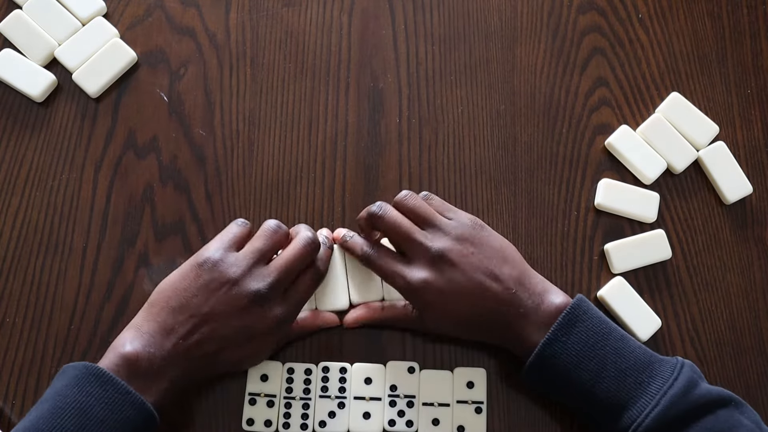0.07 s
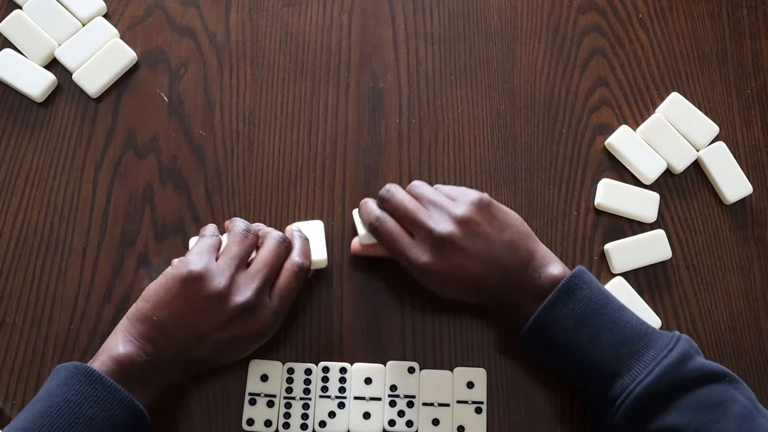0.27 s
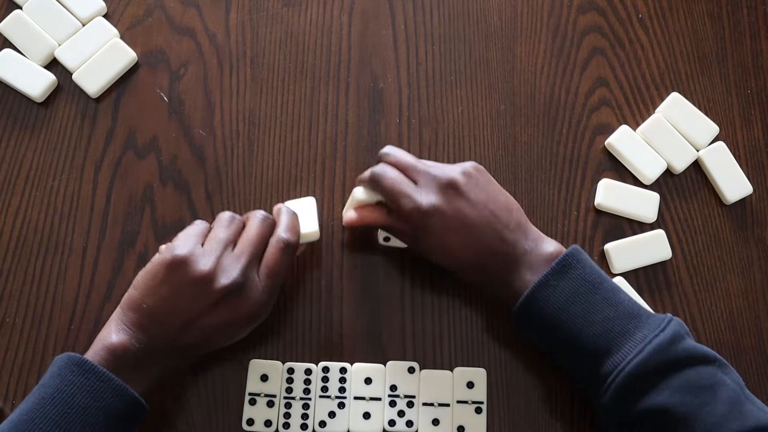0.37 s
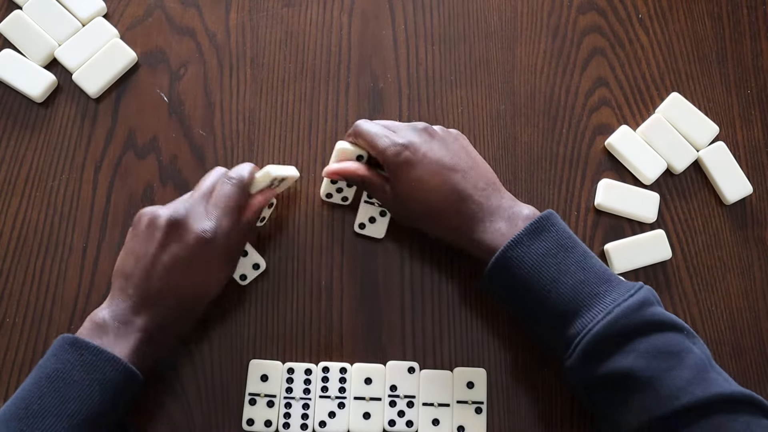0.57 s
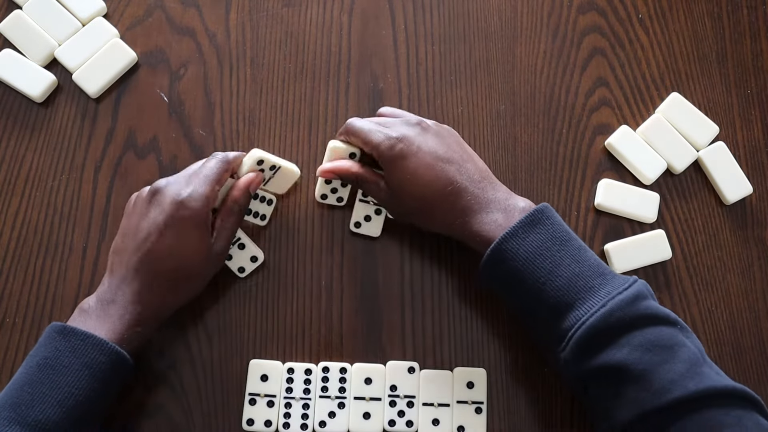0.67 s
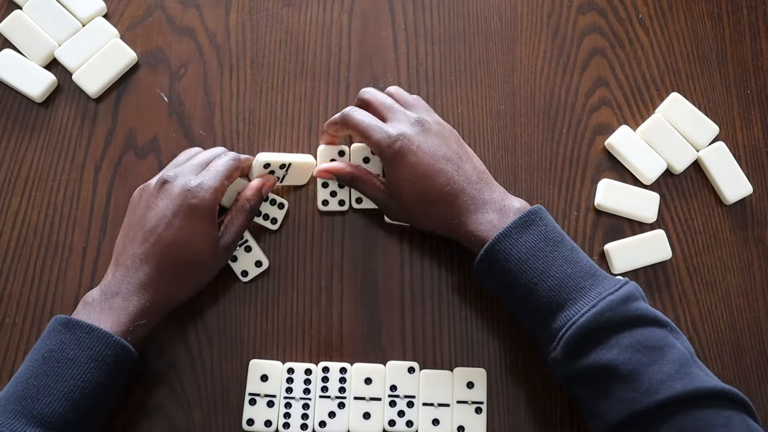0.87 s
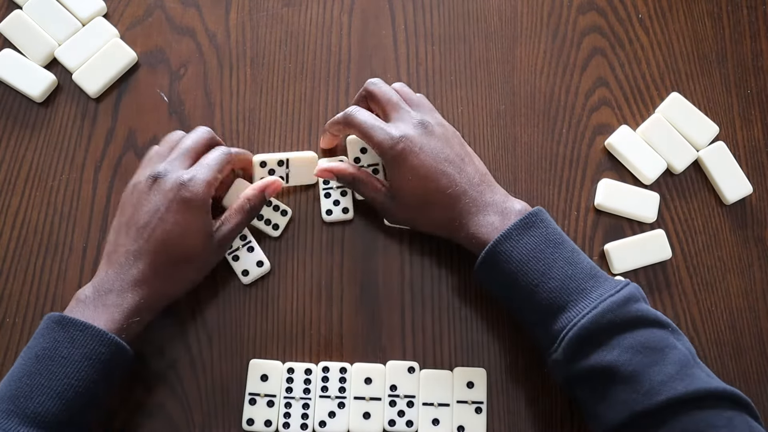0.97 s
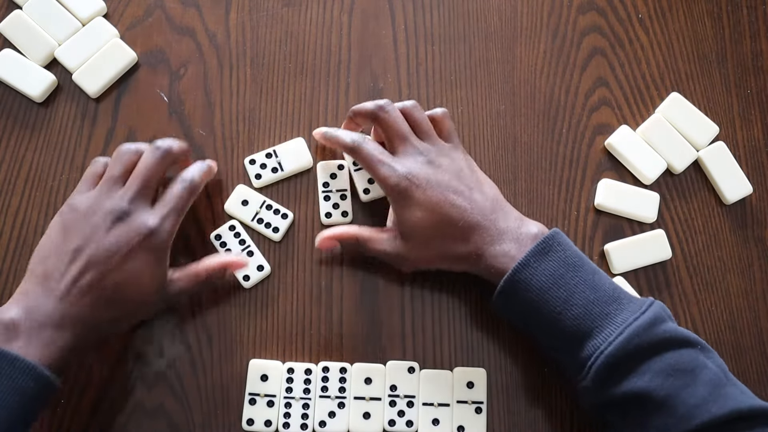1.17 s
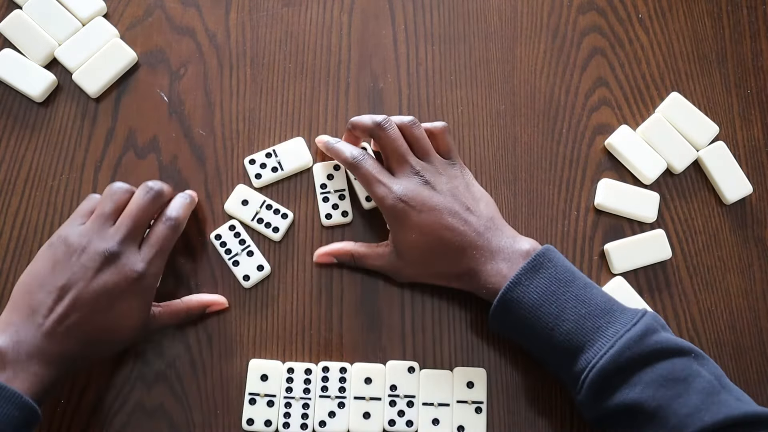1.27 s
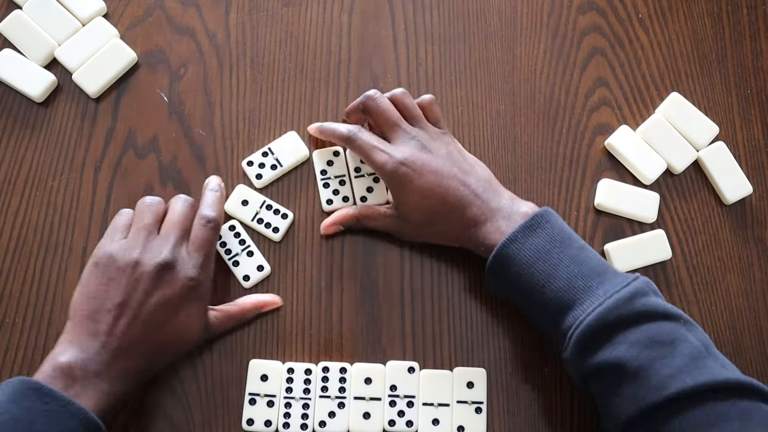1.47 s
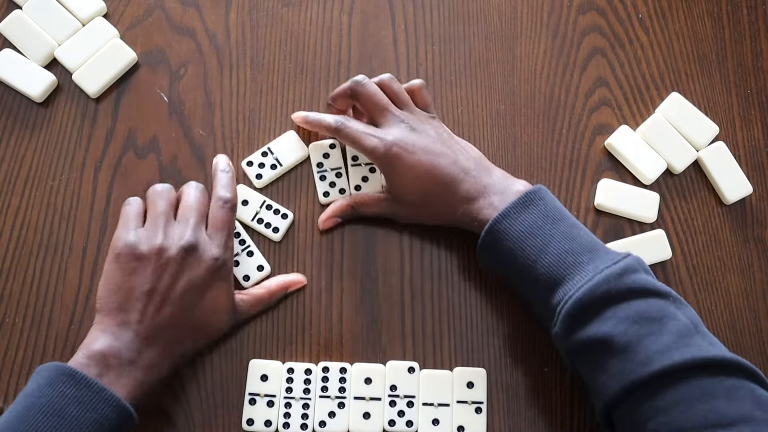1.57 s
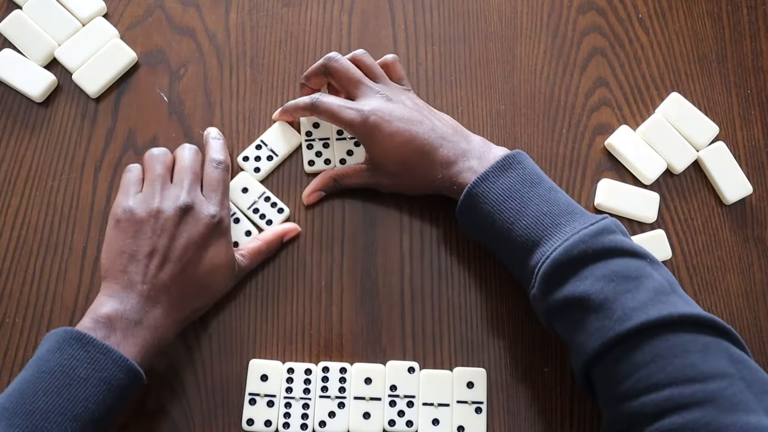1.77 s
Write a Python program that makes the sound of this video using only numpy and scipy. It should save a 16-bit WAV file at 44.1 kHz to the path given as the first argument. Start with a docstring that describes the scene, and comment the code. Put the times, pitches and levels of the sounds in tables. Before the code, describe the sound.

Hard domino tiles knocking, sliding and clicking against each other on a wooden tabletop.

```python
"""Dominoes on a wooden table

Two hands turn dominoes face up and push them about in a small room. The hard tiles slide
over the grain, knock on the wood, clack and jostle together, and twice drop flat with a thump.
Palms brush the table, the table top rings under the tiles, and the room adds a short echo."""
import sys
import numpy as np
from scipy import signal
from scipy.fft import rfft, irfft
from scipy.io import wavfile

SR = 44100
rng = np.random.default_rng(int(sys.argv[2]) if len(sys.argv) > 2 else 0)


def master_out(mix):
    """Clip the mix to full scale and print it as 16-bit PCM to the path in sys.argv[1]."""
    frames = np.transpose(np.atleast_2d(mix))
    ceiling = np.clip(frames, -1, 1)
    pcm = np.round(ceiling * 32767).astype(np.int16)
    wavfile.write(sys.argv[1], SR, pcm)


N = 79380   # 1.8 seconds

# Tiles pushed over wood. Each row: start and length in seconds, level in dB, cut-off in Hz, squeak in dB.
SLIDES = [(-.05, 0.18, -65, 2140, -1.5), (0.277, 0.049, -44.5, 2260, -6), (0.408, 0.27, -49, 1750, 0),
          (0.984, 0.36, -46.5, 4200, -13), (1.709, 0.13, -61, 4200, -12)]
# Hands brushing the table. Each row: start in seconds, length in seconds, level in dB.
BRUSHES = [(0, 0.51, -64), (0.31, 0.59, -64), (0.977, 0.37, -58), (1.324, 0.13, -62), (1.677, 0.13, -69.5)]
# A tile hits the table. Each row: start in seconds, level in dB, cut-off in Hz, bass boost in dB.
KNOCKS = [ (0.08, -51.5, 3120, 1), (0.2408, -30, 3240, -8.5), (0.2883, -32, 2700, -4.5),
          (.3130, -31, 1700, -8), (0.421, -40, 3160, -2), (0.5348, -34.5, 2420, 4), (0.5719, -27, 2820, -4),
          (0.5794, -26, 2480, 1), (0.6069, -25.5, 2770, 3.5), (0.6142, -27, 2660, 1.5),
          (0.7263, -31.5, 1510, 2), (.7944, -24.5, 3100, -1.5), (0.7972, -21.5, 2400, 2)]
# A tile hits a tile. Each row: start in seconds, level in dB, main ring in Hz, body and treble in dB.
CLACKS = [ (0.1992, -58, 2760, 13, 16), (0.2753, -41, 9470, -4, 2), (0.3124, -39.5, 8900, -8, -2),
          (0.4525, -38.5, 2880, 9.5, -4), (0.7263, -18, 2020, -5, 0), (0.7282, -25, 7800, -5, -12),
          (0.9626, -19, 3460, 0.5, -2.5), (1.0040, -18.5, 3720, 0.5, -3), (1.0065, -24.5, 3580, -9.5, 9),
          (1.0504, -23, 3020, 5, 7), (1.0539, -24, 5500, -3.5, 0), (1.0615, -27, 3430, -6.5, -2),
          (1.0660, -28.5, 3780, 2, 3), (1.0971, -32.5, 4370, 8, -5), (1.1059, -23, 3740, 5.5, 7),
          (1.111, -22, 4200, -2.5, 4), (1.1151, -23.5, 5100, -3, 4), (1.1171, -21, 2110, 2, 14),
          (1.1227, -30, 5330, -9, 4), (1.125, -23.5, 5640, -11.5, 14), (1.1632, -27, 2370, 1.5, 5),
          (1.167, -36, 5640, -7, 6), (1.2000, -24.5, 2860, -1, 5), (1.2046, -28.5, 6050, 1, 1),
          (1.2634, -21, 5020, -1, -4.5), (1.2648, -22.5, 8500, -6.5, -1), (1.5199, -44, 2140, -8.5, -17),
          (1.5287, -48.5, 4160, -6, -7), (1.6053, -44.5, 4200, -14, 17), (1.654, -51.5, 4200, 8, 2),
          (1.71, -37, 4160, -17, 14), (1.7339, -40.5, 4200, -17, 2), (1.759, -42, 4100, -13, -5),
          (1.782, -41.5, 4200, -11, 3), (1.7874, -35.5, 4300, -11.5, 10)]
# Tiles rubbing edge to edge. Each row: start in seconds, length in seconds, level in dB.
JOSTLES = [(0.713, 0.21, -53), (1.002, .28, -41), (1.718, 0.23, -57.5)]
# A tile drops flat. Each row: start in seconds, peak level in dB.
THUMPS = [(0.7965, -35), (1.1120, -37.5)]
# The tone of the background, tile on wood, hand on wood and tile on tile.
# Each row: frequency in Hz, gain in dB.
BACKGROUND_TONE = [(25, -8), (60, 4.5), (450, -6.5), (1200, -7.5), (1800, 1.5), (5000, -20), (15000, -40.5)]
WOOD_TONE = [(30, -19.5), (90, -14.5), (170, -8), (430, -1.5), (620, -2.5), (2000, 7.5), (10000, 2.5),
             (15000, -52.5)]
BRUSH_TONE = [(30, -47.5), (105, 9), (210, 6), (800, -4.5), (4000, -24), (15000, -40)]
CLACK_TONE = [(40, -42), (150, -12.5), (350, -8), (1800, 0.5), (4000, 2), (6500, -1.5), (9200, -6),
              (10800, -10.5), (16000, -15.5)]
# The notes a tile rings at. Each row: pitch in Hz, level in dB, fade time in seconds.
# A fade time is how long a sound takes to drop by 60 dB.
TILE_NOTES = [(1840, -13.5, 0.039), (4200, -18.5, 0.014), (8700, -19, 0.009)]
# The notes the table top rings at. Each row: pitch in Hz, gain in dB.
TABLE_NOTES = [(168, 7.5), (428, 12.5), (471, 10), (768, 9), (1229, 2.5)]
# How strong the room's echo is. Each row: frequency in Hz, level in dB.
ROOM_LEVEL = [(200, 0), (1000, 2.5), (4500, -5.5), (8000, -11), (14000, -4.5)]
# How long the echo lasts. Each row: frequency in Hz, fade time in seconds.
ROOM_FADE = [(150, .56), (700, .41), (2000, .39), (5000, .3), (12000, .17)]
# How alike left and right are, for close sounds and for spread-out ones.
# Each row: frequency in Hz, likeness (1 is identical, 0 is unrelated).
NEAR_LIKENESS = [(600, 1), (4000, 0.49)]
WIDE_LIKENESS = [(400, 0.95), (1500, 0.017)]

CLACK_CHATTER_S, CLACK_SNAP_DB = 0.01, -12   # shared by clacks and jostles


def from_db(db):
    """Turn decibels into a number to multiply by."""
    return 10 ** (np.asarray(db) / 20)


def unit(x):
    """Scale a sound so its channels have an average energy of one."""
    return x / np.sqrt(np.mean(np.sum(x ** 2, axis=-1)) + 1e-20)


def freqs(size):
    """List the frequencies in a sound of that many samples."""
    return np.maximum(np.fft.rfftfreq(size, 1 / SR), 1)


def at_hz(table, hz):
    """Read between a table's rows, giving every octave equal room."""
    row_hz, value = np.transpose(table)
    return np.interp(np.log(hz), np.log(row_hz), value)


def below(hz, edge_hz):
    """A smooth step: one well under the edge, zero well above it."""
    return 1 / (1 + (hz / edge_hz) ** 4)


def shape_tone(x, db):
    """Turn each frequency up or down without smearing the sound earlier (a minimum-phase filter)."""
    size = x.shape[-1]
    cepstrum = irfft(np.log(from_db(db)), size)
    cepstrum[1:size // 2] *= 2
    cepstrum[size // 2 + 1:] = 0
    return irfft(rfft(x) * np.exp(rfft(cepstrum)), size)


def stereo_noise(likeness, size):
    """Make a hiss whose left and right sides are alike in the bass."""
    alike = np.clip(at_hz(likeness, freqs(size)), -1, 1)
    mid, side = rfft(rng.standard_normal((2, size)))
    return irfft(np.sqrt(1 + alike) * mid + np.sqrt(1 - alike) * side * [[1], [-1]], size)


def ring(x, hz, fade_s):
    """Let a sound set one note ringing."""
    decay = from_db(-60 / (fade_s * SR))
    feedback = [1, -2 * decay * np.cos(2 * np.pi * hz / SR), decay ** 2]
    return signal.lfilter((1 - decay ** 2) / 2 * np.array([1, 0, -1]), feedback, x + 1e-18)


def add(out, start, sound):
    """Mix a sound in at a start time in seconds."""
    i = max(int(start * SR), 0)
    out[:, i:i + sound.shape[1]] += sound[:, :max(N - i, 0)]


def contact(chatter_s, snap_db, size=4096):
    """The force of a hit: a sharp snap, set against the dying chatter that follows."""
    t = np.arange(size) / SR
    chatter = stereo_noise(NEAR_LIKENESS, size) * from_db(-60 * t / chatter_s)
    return unit(chatter) - from_db(snap_db) * (t == 0)


def at_level(hit, db):
    """Give a hit the energy of 1.5 milliseconds of sound at that level."""
    return unit(hit) * from_db(db) * np.sqrt(.0015 * SR)


def wood_softening_db(hz, cut_hz, leak_db=-27.5):
    """Wood gives a little, so only a small part of the force gets through above the cut-off."""
    return 20 * np.log10(below(hz, cut_hz * np.sqrt(2)) ** 4 + from_db(leak_db))


def stroke(sound, start, length, db):
    """A hand movement swells to the given level and fades."""
    progress = np.clip((np.arange(N) / SR - start) / length, 0, 1)
    return unit(sound) * np.sqrt(N) * from_db(db) * np.sin(np.pi * progress)


def background(level_db=-66):
    """A faint, steady rush lies under everything."""
    rush = shape_tone(stereo_noise(WIDE_LIKENESS, N), at_hz(BACKGROUND_TONE, freqs(N)))
    return unit(rush) * np.sqrt(N) * from_db(level_db)


def slides(slips_per_s=1500, spread_db=2.5):
    """Sliding tiles slip over the grain in many tiny steps, at times with a dull squeak."""
    out, hz = 0, freqs(N)
    for start, length, db, cut_hz, squeak_db in SLIDES:
        sizes = from_db(spread_db * np.minimum(rng.exponential(1, N), 4))
        slips = (rng.random(N) < slips_per_s / SR) * sizes * stereo_noise(NEAR_LIKENESS, N)
        rub = shape_tone(slips, at_hz(WOOD_TONE, hz) + wood_softening_db(hz, cut_hz))
        squeak = from_db(squeak_db) * unit(ring(rub, hz=920, fade_s=0.025))
        out += stroke(unit(rub) + squeak, start, length, db)
    return out


def table_ring(x):
    """The tiles set the table top ringing at its own notes; every second note swings the other way."""
    force = x.mean(axis=0)
    return sum((-1) ** k * from_db(db) * ring(force, hz, fade_s=0.2)
               for k, (hz, db) in enumerate(TABLE_NOTES))


def room_echo(x, gap_s=0.0021, build_s=0.0038, top_hz=14000):
    """A dense echo builds up just after each sound and dies sooner in the treble."""
    hz, t = freqs(SR), np.maximum(np.arange(SR) / SR - gap_s, 0)
    centres = np.geomspace(100, 12800, 8)   # bands an octave apart, in Hz
    noise = rfft(stereo_noise(WIDE_LIKENESS, SR)) / np.sqrt(2) * below(hz, top_hz) ** 2
    echo = 0
    for centre, pick in zip(centres, np.eye(len(centres))):
        band = irfft(noise * np.interp(np.log(hz), np.log(centres), pick), SR)
        fade = from_db(-60 * t / at_hz(ROOM_FADE, centre))
        rise = 1 - np.exp(-t / build_s)
        echo += band * unit(rise * fade) * from_db(at_hz(ROOM_LEVEL, centre))
    return signal.fftconvolve(x, echo, axes=1)[:, :N]


def brushes():
    """Palms and sleeves rub a low murmur out of the table."""
    rub = shape_tone(stereo_noise(WIDE_LIKENESS, N), at_hz(BRUSH_TONE, freqs(N)))
    return sum(stroke(rub, start, length, db) for start, length, db in BRUSHES)


def knocks():
    """Tiles tip over and land on the wood with a dull knock."""
    out = np.zeros((2, N))
    for start, db, cut_hz, bass_db in KNOCKS:
        force = contact(chatter_s=0.042, snap_db=-4)
        hz = freqs(force.shape[1])
        tone_db = at_hz(WOOD_TONE, hz) + wood_softening_db(hz, cut_hz) + bass_db * below(hz, 1830)
        add(out, start, at_level(shape_tone(force, tone_db), db))
    return out


def clacks(main_ring_db=-5.5, main_fade_s=0.0076, dull_below_db=-1):
    """Hard tiles strike each other and ring briefly; where they touch sets the main ring."""
    out = np.zeros((2, N))
    for start, db, main_hz, body_db, treble_db in CLACKS:
        force = contact(CLACK_CHATTER_S, CLACK_SNAP_DB)
        hz = freqs(force.shape[1])
        hit = unit(shape_tone(force, at_hz(CLACK_TONE, hz)))
        tuning = 1 + 0.052 * rng.uniform(-1.23, 1)   # no two tiles ring at quite the same pitch
        for note_hz, note_db, fade_s in TILE_NOTES:
            hit += from_db(note_db) * unit(ring(force, note_hz * tuning, fade_s))
        hit += from_db(main_ring_db) * unit(ring(force, main_hz, main_fade_s))
        body = below(hz, 2320)
        treble = below(hz, 13500) - below(hz, 6550)
        very_top = (1 - below(hz, 15560)) ** 2
        top_loss_db = 5 * (dull_below_db - db)   # quieter clacks are made duller in the highest treble
        tone_db = body_db * body + treble_db * treble - top_loss_db * very_top
        add(out, start, at_level(shape_tone(hit, tone_db), db))
    return out


def jostles(touches_per_s=350, spread_db=3):
    """Tiles pressed together give a dense run of tiny bright clicks."""
    hz = freqs(N)
    sizes = from_db(spread_db * np.minimum(rng.exponential(1, N), 3))
    touches = (rng.random(N) < touches_per_s / SR) * sizes * rng.choice([-1, 1], N)
    force = signal.fftconvolve(touches[None], contact(CLACK_CHATTER_S, CLACK_SNAP_DB), axes=1)[:, :N]
    softening_db = 20 * np.log10(below(hz, 11000))   # the rattle is softened above 11 kHz
    rattle = shape_tone(force, at_hz(CLACK_TONE, hz) + softening_db)
    return sum(stroke(rattle, start, length, db) for start, length, db in JOSTLES)


def thumps(pitch_hz=467.3, fade_s=0.12):
    """The broad face of a tile pushes the table top, which answers with a low woody note."""
    out, t = np.zeros((2, N)), np.arange(16384) / SR
    note = np.sin(2 * np.pi * pitch_hz * t) * from_db(-60 * t / fade_s)
    for start, db in THUMPS:
        add(out, start, from_db(db) * note[None])
    return out


def lean_left(sound, tilt_db=0.5, lag_s=0.000065):
    """The left side is slightly nearer, so the right is a little quieter and later."""
    left, right = sound
    t = np.arange(N) / SR
    return np.array([left * from_db(tilt_db), np.interp(t - lag_s, t, right) * from_db(-tilt_db)])


def scene():
    """Mix the tiles, table, hands and room over the quiet background."""
    on_tile = clacks() + jostles()
    on_table = knocks() + slides()
    tiles = on_tile + on_table
    near = lean_left(tiles + table_ring(tiles))
    # Tile faces throw their clack straight up, so less of it reaches the room.
    into_room = on_table + from_db(-2) * on_tile
    return near + background() + room_echo(into_room) + brushes() + thumps()


def record(dry, ceiling=0.24, top_hz=16300):
    """Round off the tallest peaks and steeply cut the highest treble."""
    rounded = dry / (1 + (dry / ceiling) ** 4) ** .25
    return signal.sosfilt(signal.ellip(10, .1, 80, top_hz, fs=SR, output="sos"), rounded)


dry = scene()
out = record(dry)
master_out(out)
```